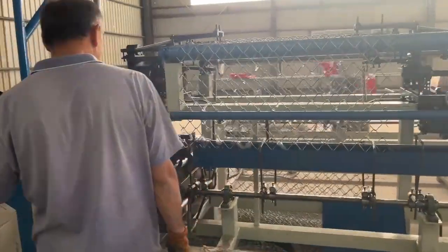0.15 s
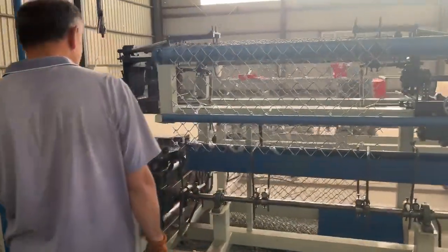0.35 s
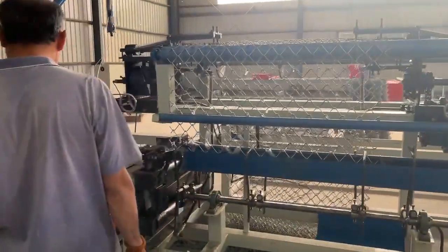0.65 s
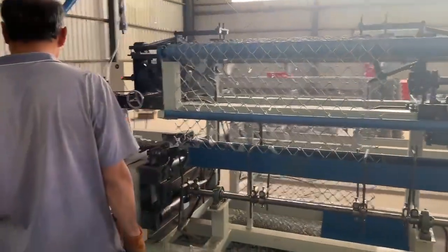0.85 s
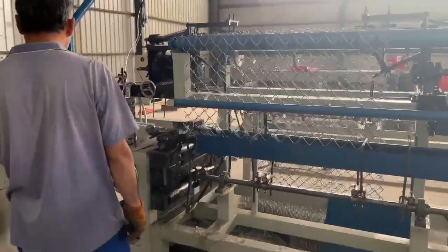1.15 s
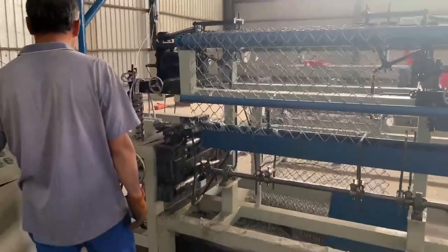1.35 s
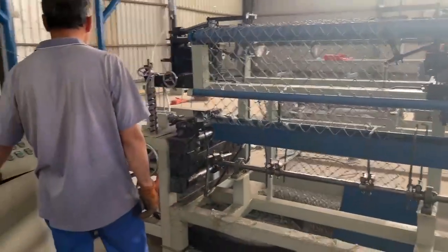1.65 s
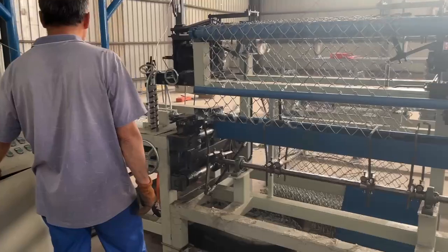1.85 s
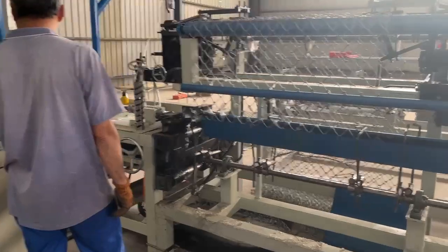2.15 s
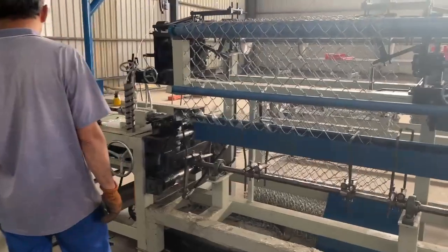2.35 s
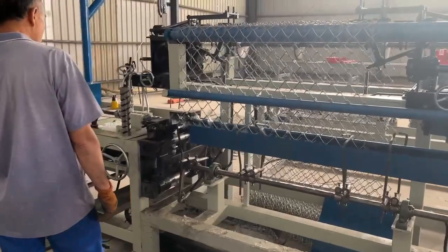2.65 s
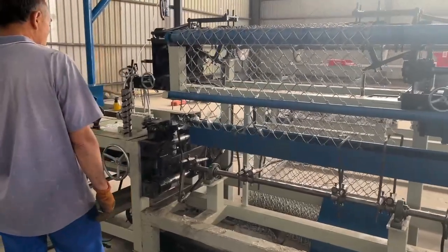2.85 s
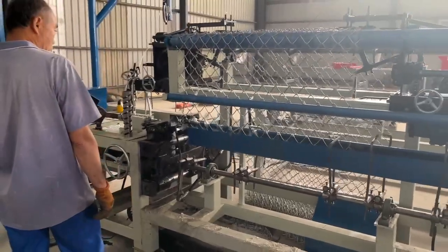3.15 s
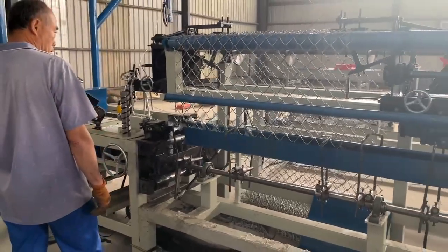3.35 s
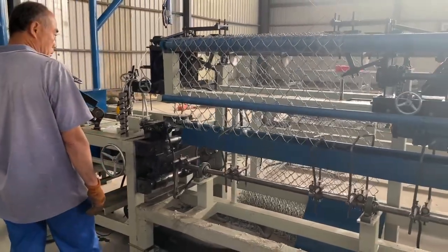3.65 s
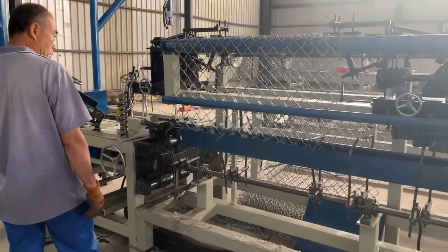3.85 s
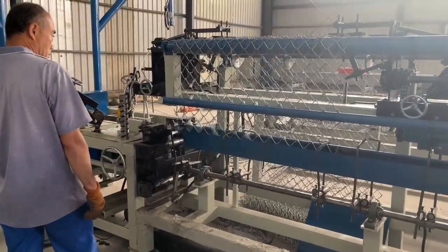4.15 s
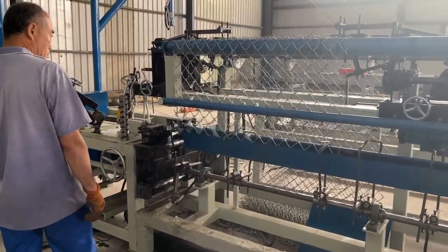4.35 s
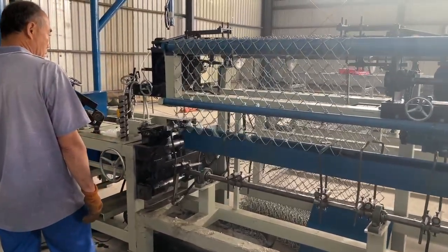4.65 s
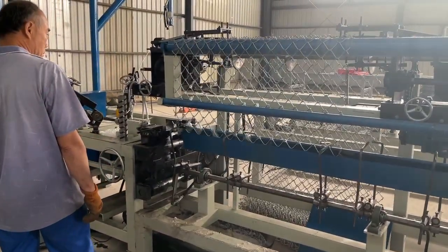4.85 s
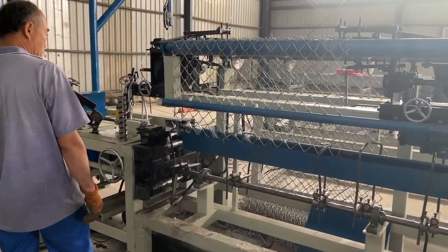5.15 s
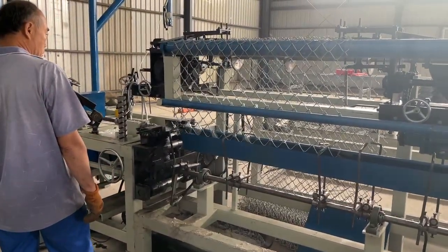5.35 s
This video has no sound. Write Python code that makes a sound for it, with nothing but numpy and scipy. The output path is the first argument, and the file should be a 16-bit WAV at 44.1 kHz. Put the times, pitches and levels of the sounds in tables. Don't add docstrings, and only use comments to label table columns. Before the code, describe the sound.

Sharp metallic wire slaps build to a rapid rattling beat, break off, then a single hard clank rings and small metal ticks follow.

```python
import sys
import numpy as np
from scipy import signal
from scipy.fft import rfft, irfft, next_fast_len
from scipy.io import wavfile
from scipy.ndimage import map_coordinates

SR = 44100
rng = np.random.default_rng(int(sys.argv[2]) if len(sys.argv) > 2 else 0)


def inscribe(sig):
    pcm = np.round(np.clip(np.atleast_2d(sig).T, -1, 1) * 32767)
    wavfile.write(sys.argv[1], SR, pcm.astype(np.int16))


def ratio(d):
    e = np.asarray(d, float) / 20
    return 10 ** e


N = 242975
TIME = np.arange(N) / SR

# [time_s, mesh_shaking_db, drive_load_db]
WORK = [(0, -36.5, -40), (.64, -38, -37.5), (1.1, -42, -37), (1.29, -35.5, -54), (1.47, -37.5, -47),
        (1.61, -30, -34), (2.53, -32, -36), (2.75, -25, -33), (3.21, -27, -32), (3.481, -33.5, -30),
        (3.591, -43, -46), (3.815, -29.5, -38), (3.865, -22.5, -29), (4, -36, -32), (4.45, -41, -33),
        (4.65, -53, -61), (4.93, -46, -42), (5.1, -38, -38)]
# [freq_hz, density_db_per_hz]
MESH_SPECTRUM = [(500, -4), (1200, 4), (2000, 2), (3500, 0.5), (6000, -4), (8000, -5.5), (11000, -10.5),
                 (15400, -20), (15900, -50)]
# [freq_hz, density_db_per_hz]
DRONE_SPECTRUM = [(15, -68), (25, -28), (53, -8.5), (199, -4), (319, -4), (385, -3), (433, -5.5), (562, -4),
                  (603, -5), (647, -5.5), (1870, -15), (7000, -38), (9100, -70), (15400, -120)]
DRONE_DB, LULL_S, LULL_LENGTH_S, LULL_DB = -29.5, 3.47, 0.27, -5
FAR_LINE_DB, SURGE_S, SURGE_LENGTH_S, SURGE_DB = -61.5, 1.2, 0.6, 20.5
MOUNT_UPPER_DB, STOP_S, STOP_DB = -40.5, 3.32, -16
# [pitch_hz, width_hz, level_db]
STEEL_MODES = [(1215, 10, -5.5), (1767, 39, 5.5), (2000, 78, -4), (2650, 41, 6), (3900, 10, -22),
               (4270, 35, 5.5), (4900, 20, -30), (5590, 43, 7), (6340, 54, -9)]
# [pitch_hz, width_hz, level_db]
FRAME_MODES = [(230, 3.3, 0), (297.7, 4.1, -5), (364.6, 3.4, 1.5), (415, 29.6, -1.5), (440.5, 5.4, 3.5),
               (458, 27.4, 0)]

# [start_s, peak_db, sizzle_db (re peak), bar_pitch_hz]
FEEDING = [(.0537, -23, -12, 6380), (.1003, -17, -25, 4380), (.115, -39, -21, 2000),
           (.1966, -21, -28, 3870), (.344, -22, -19, 6300), (.373, -26, -4, 5980),
           (.3965, -12.5, -16, 6310), (.4194, -25, -6, 4790), (.628, -30, -7, 4480),
           (.6491, -13, -9.5, 6000), (.6886, -18.5, -9, 4700), (.7205, -19.5, -7, 2350),
           (.9114, -27.5, -9, 2030), (.9273, -24, -13, 2500), (.953, -16, -13, 5700),
           (.9725, -17, -7, 4210), (.999, -15.5, -9, 4070), (1.211, -31, -8, 2080),
           (1.2612, -19.5, -9.5, 2040), (1.275, -15.5, -9, 5240), (1.3397, -13, -11, 2800),
           (1.4641, -22.5, -9, 2770), (1.5283, -27.5, -8.5, 2520)]
# [start_s, peak_db, sizzle_db (re peak), bar_pitch_hz]
WEAVING = [(1.5738, -15.5, -13, 4090), (1.6393, -15, -10, 5950), (1.7375, -13, -6, 4160),
           (1.8562, -12.5, -11, 2050), (1.939, -13, -18, 2350), (2.029, -10.5, -19, 3720),
           (2.0804, -12, -15, 2050), (2.162, -12, -16, 2060), (2.2458, -16.5, -11, 2630),
           (2.3229, -9.5, -14.5, 4030), (2.409, -9.5, -12, 2000), (2.4665, -12.5, -23, 5890),
           (2.5368, -9.5, -15, 4760), (2.6223, -8, -13.5, 2430), (2.697, -8.5, -19, 2070),
           (2.7714, -11, -21, 4270), (2.9242, -7, -14, 2650), (2.9893, -5.5, -17, 2165),
           (3.0749, -10.5, -14, 6340), (3.1605, -20.5, -8, 2630), (3.2358, -8, -19, 5470),
           (3.3113, -6.5, -10, 2115)]
# [start_s, peak_db, sizzle_db (re peak), bar_pitch_hz]
TOUCHES = [(1.6595, -15.5, -9.5, 4070), (1.8803, -15.5, -15, 4080), (1.896, -14, -16, 3900),
           (2.175, -15, -10, 4200), (2.0542, -12, -12, 4200), (2.187, -9, -20, 4230),
           (2.359, -15.5, -16, 5160), (2.382, -19, -17, 2040), (2.4818, -12, -11, 4420),
           (2.495, -11, -25, 6070), (2.783, -8, -19, 3190), (2.8024, -29, -20, 4180),
           (3.0894, -9.5, -26, 5630), (3.1097, -11.5, -25, 1760), (3.3274, -5.5, -31, 2040)]
# [start_s, peak_db, sizzle_db (re peak), bar_pitch_hz]
SETTLING = [(3.521, -29, -4, 3140), (3.5394, -27, -25, 1820), (3.5686, -23, -26, 2445),
            (3.6905, -22, -19, 3500), (3.754, -29, -6, 2770), (3.7852, -19.5, -5, 3340),
            (3.8442, -6, -29, 1870), (4.0122, -23.5, -4, 1790), (4.06, -27, -19, 1980),
            (4.125, -19.5, -26, 4860), (4.2994, -31, -16, 2300), (4.3994, -44, -27, 1970),
            (4.5875, -27, -13, 2000), (4.8199, -32, -30, 3570), (4.8404, -22, -16, 5374),
            (4.9094, -22.5, -11, 2000), (4.9167, -32, -11, 3360), (4.9636, -31, -11, 1890),
            (5.019, -37, -8.5, 2500), (5.0594, -28.5, -11, 2090), (5.0978, -41, -10, 1870),
            (5.1427, -26, -17, 2760), (5.1959, -14.5, -14, 4900), (5.2144, -37, -25, 2160),
            (5.2485, -24.5, -26, 2050), (5.4625, -23.5, -17, 1990), (5.5024, -14.5, -12, 6550)]
FEED_BODY_DB, WEAVE_BODY_DB, TOUCH_BODY_DB, SETTLE_BODY_DB = -13.5, -13.5, -15.5, -5
SLAP_T60_S, WEAK_LINGERS = 0.1, 0.28
TURN_S, HEAVY_AT_S, HEAVY_SPREAD_S, HEAVY_DB = 0.3045, 0.12, 0.039, 5
# [freq_hz, density_db_per_hz]
BODY_SPECTRUM = [(200, -33), (500, 1), (1000, 3.5), (1600, 8.5), (2300, -1.5), (3500, -23)]
# [freq_hz, density_db_per_hz]
CRACK_SPECTRUM = [(1200, -28), (2200, -3), (3500, -0.5), (5000, -1), (6800, -1.5), (9000, -14)]
# [freq_hz, density_db_per_hz]
SIZZLE_SPECTRUM = [(5500, -6), (7500, 3), (9000, 6), (11000, -4), (13000, -7), (15400, -2), (15900, -30)]
# [start_s, peak_db, pitch_hz, t60_s]
CLINKS = [(.975, -33, 4200, .1), (3.786, -19, 7200, 0.069), (3.876, -25, 5620, 0.11),
          (3.935, -28, 5650, .15), (4.126, -30, 4900, 0.17), (4.82, -28, 3530, 0.04),
          (4.842, -34, 3560, .04), (4.82, -29, 5420, 0.034), (4.822, -41, 4350, .1),
          (4.84, -31, 5520, 0.06), (4.88, -41, 5960, .07), (4.914, -28, 3385, 0.066),
          (4.93, -38, 3340, 0.11), (5.143, -43, 5610, .1), (5.197, -41, 4900, 0.13),
          (5.197, -29, 7200, .06), (5.197, -31, 5850, .05), (4.91, -44, 7050, 0.073),
          (5.249, -43, 5470, .08), (5.272, -39, 5550, .08), (5.463, -40, 5640, 0.062)]

# [start_s, peak_db]
SPARKS = [(0.0633, -25), (0.1012, -19), (0.1984, -27), (0.3481, -26), (0.3975, -28), (0.6499, -24),
          (0.9722, -28), (0.9996, -22), (1.2471, -27), (1.2745, -20), (1.3404, -15), (1.497, -27),
          (1.5299, -26), (1.5743, -19), (1.6591, -16), (1.7379, -18), (1.8572, -24), (1.8951, -18),
          (1.9385, -14), (2.0288, -18), (2.0537, -22), (2.0797, -14), (2.1615, -20), (2.175, -11),
          (2.2465, -14.5), (2.3226, -14.5), (2.3815, -19), (2.409, -8), (2.4833, -14), (2.4944, -20),
          (2.536, -10.5), (2.6219, -13), (2.6953, -10), (2.7716, -22), (2.7856, -11), (2.9257, -12.5),
          (2.9871, -9), (3.0742, -13), (3.0894, -15), (3.161, -15), (3.2355, -12), (3.31, -8),
          (3.5204, -40), (3.6895, -38), (3.7055, -28), (3.7808, -21), (3.8447, -15.5), (3.9335, -25),
          (4.0133, -19), (4.576, -45), (4.8464, -33), (4.9611, -30), (5.1953, -12.5), (5.461, -34),
          (5.5029, -14.5)]
# [freq_hz, density_db_per_hz]
SPARK_SPECTRUM = [(6000, -14), (9000, -7), (11500, -1), (13000, -3), (15300, -4), (15900, -35)]
# [start_s, peak_db, pitch_hz]
SNAPS = [(0.101, -18, 4330), (0.1991, -18, 3890), (0.3447, -11, 6400), (0.3965, -16, 6280),
         (0.411, -10.5, 1500), (0.6491, -9.5, 5960), (0.689, -16, 1640), (1.275, -13, 5200),
         (1.3409, -11.5, 1590), (1.6597, -13.5, 1500), (1.7376, -11.5, 4140), (1.8562, -19, 2040),
         (1.8964, -18, 4310), (1.9395, -9.5, 6520), (1.9494, -11, 1500), (2.0303, -12, 3770),
         (2.0537, -17, 4250), (2.0807, -23, 2120), (2.162, -15, 1990), (2.1754, -14, 2190),
         (2.189, -12, 4350), (2.2476, -14, 2590), (2.3226, -12, 4060), (2.3318, -9, 1800),
         (2.3585, -16, 5110), (2.3814, -13.5, 2460), (2.4094, -20, 2000), (2.4838, -3.5, 4330),
         (2.4954, -10, 5960), (2.5334, -10, 1940), (2.5388, -9.5, 1500), (2.6232, -10, 2420),
         (2.6973, -15, 2010), (2.7721, -10, 4220), (2.7833, -8, 3140), (2.802, -9, 4080),
         (2.9243, -9, 3740), (2.9298, -9.5, 2650), (2.9464, -11.5, 1780), (2.9897, -8, 4180),
         (2.9934, -9.5, 2140), (3.0746, -9, 6370), (3.0914, -9, 5620), (3.111, -8, 1790),
         (3.2352, -12, 5360), (3.3119, -12, 4430), (3.3294, -15, 1990), (3.3503, -7.5, 1760),
         (3.84, -12, 2290), (3.845, -5, 1970), (3.9922, -23, 2500), (4.0134, -12.5, 1690),
         (4.126, -16, 4770), (5.1971, -13.5, 1570)]
# [freq_hz, density_db_per_hz]
SNAP_SPECTRUM = [(1000, -27), (2000, -1), (4000, -1.5), (6300, 1), (7500, 2), (9500, -18)]

# [start_s, peak_db, t60_s]
BLOWS = [
    (0.404, -27, 0.18),
    (1.02, -26, 0.15),
    (3.317, -24, 0.38),
    (3.533, -30.5, 0.45),
    (3.555, -26, 0.31),
    (3.578, -23, 0.37),
    (3.848, -16.5, 0.51),
    (3.865, -38, 0.31),
    (5.084, -34, 0.18),
    (5.151, -28, 0.24),
]
# [freq_hz, density_db_per_hz]
THUD_SPECTRUM = [(40, -10), (100, 2), (300, 4.5), (700, 2), (1300, 2), (2200, -9), (4000, -14), (8000, -59)]
# [start_s, peak_db]
WIDE_PANEL = [(.41, -23), (1.246, -28.5), (1.739, -31), (2.261, -22), (2.399, -30), (2.699, -19),
              (2.818, -30), (2.991, -24.5), (3.181, -26), (3.309, -28), (3.581, -28), (3.849, -19.5),
              (4.082, -31)]
WIDE_HZ, WIDE_T60_S, NARROW_T60_S = 371.5, 0.44, 0.38
# [start_s, peak_db, pitch_hz]
NARROW_PANELS = [(.413, -25.5, 455), (1.024, -27, 431), (1.346, -24.5, 440), (1.452, -33, 439),
                 (1.633, -27, 457), (1.946, -21, 426), (2.136, -22, 461.5), (2.539, -35, 459),
                 (2.704, -36, 458), (2.809, -32, 435), (2.997, -25.5, 438), (3.315, -21, 444),
                 (3.452, -41, 445), (3.855, -22, 420), (4.082, -36, 425), (4.412, -26.5, 431.6)]

# [start_s, peak_db, t60_s]
CUTTER = [
    (3.846, -14.5, 0.05),
    (4.4, -25, 0.18),
    (3.6, -37, 0.17),
    (3.9, -32, 11.8),
]
# [freq_hz, density_db_per_hz]
CLANK_SPECTRUM = [(400, -45), (750, -6.5), (1100, 2.5), (1900, -0.5), (2700, -4.5), (4200, -12.5),
                  (6500, -24), (10000, -42)]
# [start_s, peak_db, pitch_hz, t60_s]
BED = [
    (3.846, -11.5, 785, 0.045),
    (3.846, -14, 2017, 0.084),
    (3.846, -13, 2840, .05),
    (3.847, -19, 1125, 0.045),
    (3.855, -20, 398.7, 0.16),
    (3.868, -12.5, 2090, .06),
    (3.575, -26.5, 327, .15),
    (3.585, -26, 480, 0.11),
    (3.606, -32, 302, .12),
]

# [freq_hz, t60_s]
HALL_DECAY = [(100, 0.48), (500, 2.5), (2000, 0.89), (4000, 1.3), (7000, 0.72), (14000, 0.49)]
# [freq_hz, likeness_0_to_1]
PORT_LIKENESS = [(60, 1), (300, 0.92), (700, 0.37), (1300, 0.36), (2500, 0.64), (4400, 0.24), (6300, 0.46),
                 (7500, 0.83), (8500, 0.92), (16000, 0.84)]
# [freq_hz, lead_rad]
PORT_LEAD = [(0, 0), (860, .4), (1550, -1.5), (1900, .6), (4400, .8), (5600, -1.1), (6500, -1.45),
             (16500, -10.5)]
# [freq_hz, left_minus_right_db]
PORT_TILT = [(60, -0.5), (110, 0.5), (200, -1), (380, 1), (700, 0.5), (1290, 0), (2380, 2), (4400, 7),
             (8120, 0), (15000, -0.5)]


def unit(x):
    return x / np.sqrt(np.mean(x ** 2) + 1e-20)


def along(points, hz):
    f, v = np.transpose(points)
    return np.interp(np.log(hz + 1), np.log(f + 1), v)


def wobble(rate):
    knots = rng.standard_normal(int(N * rate / SR) + 4)
    return map_coordinates(knots, [TIME * rate])


def swell(at, length):
    return np.exp(-((TIME - at) / length) ** 2)


def filtered(x, response):
    m = next_fast_len(N + SR // 2)
    hz = np.fft.rfftfreq(m, 1 / SR)
    return irfft(rfft(x, m) * response(hz), m)[..., :N]


def modes(table):
    def response(f):
        total = 0
        for k, (center, width, db) in enumerate(table):
            damping = 1j * f * width
            total = total + (-1) ** k * ratio(db) * damping / (center * center - f * f + damping)
        return total
    return response


def hiss(spectrum, grit_db, rate):
    noise = rng.standard_normal((2, N)) * ratio(grit_db * wobble(rate))
    lowest_hz = 0.7 * spectrum[0][0]
    return unit(filtered(noise, lambda hz: ratio(along(spectrum, hz)) * (hz > lowest_hz)))


def bursts(starts, peak_db, t60, rise, hold):
    power = np.zeros(N + SR)
    for s, db, life in zip(starts, peak_db, np.maximum(t60, 0.02)):
        t = np.arange(round(min(life + hold, 0.9) * SR)) / SR
        snap = 1 + 0.89 * np.exp(-t / 0.0042)
        fade = ratio(db - 60 * np.maximum(t - hold, 0) / life)
        shape = np.minimum(t / rise, 1) * snap * fade
        power[round(s * SR):][:len(t)] += shape ** 2
    return np.sqrt(power[:N])


def rings(starts, peak_db, hz, t60, rise, rough_db):
    out = np.zeros((2, N + SR))
    phases = rng.uniform(0, 2 * np.pi, (len(starts), 2, 1))
    for s, db, f, life, phase in zip(starts, peak_db, hz, np.clip(t60, 0.02, 0.9), phases):
        t = np.arange(round(life * SR)) / SR
        fade = ratio(db - 60 * t / life) * (1 - np.exp(-t / rise))
        out[:, round(s * SR):][:, :len(t)] += fade * np.sin(2 * np.pi * f * t + phase)
    return out[:, :N] * ratio(rough_db * (np.clip(wobble(250), -3, 1.2) + 0.4))


def steady():
    s, *levels = np.transpose(WORK)
    mesh_db, hum_db = (np.interp(TIME, s, level) for level in levels)
    ticks = hiss(MESH_SPECTRUM, grit_db=2.0, rate=280) * ratio(2.1 * wobble(40))
    mesh = ratio(mesh_db) * unit(ticks + ratio(2.0) * filtered(ticks, modes(STEEL_MODES)))
    shakes = rng.standard_normal((2, N)) * ratio(1.6 * wobble(31))
    hum = ratio(hum_db - 1.5) * unit(filtered(shakes, lambda hz: modes(FRAME_MODES)(hz) ** 2))
    drone_db = DRONE_DB + LULL_DB * swell(LULL_S, LULL_LENGTH_S)
    drone = ratio(drone_db - 2.0 + 1.6 * wobble(4.32)) * hiss(DRONE_SPECTRUM, grit_db=0.3, rate=55)
    return mesh + hum + drone


def motor():
    low_db = FAR_LINE_DB + SURGE_DB * swell(SURGE_S, SURGE_LENGTH_S)
    stopped = np.clip((TIME - STOP_S) / 0.21, 0, 1)
    upper_db = MOUNT_UPPER_DB + STOP_DB * stopped + 0.79 * wobble(2.86)
    low = ratio(low_db) * np.sin(2 * np.pi * 69 * TIME + 2.0 * wobble(4.4))
    upper = ratio(upper_db) * np.sin(2 * np.pi * 232.5 * TIME + 1.0 * wobble(7.4))
    return (low + upper) * np.ones((2, 1))


def slaps():
    kinds = [(FEEDING, FEED_BODY_DB), (WEAVING, WEAVE_BODY_DB),
             (TOUCHES, TOUCH_BODY_DB), (SETTLING, SETTLE_BODY_DB)]
    events = [(*row, body) for rows, body in kinds for row in rows]
    s, db, sizzle_db, bar_hz, body_db = np.transpose(events)
    t60 = SLAP_T60_S * ratio(-WEAK_LINGERS * (db + 6.5))
    off_guide = (s - HEAVY_AT_S + TURN_S / 2) % TURN_S - TURN_S / 2
    turning = s < SETTLING[0][0]
    body_db = body_db + HEAVY_DB * np.exp(-(off_guide / HEAVY_SPREAD_S) ** 2) * turning

    body_envelope = bursts(s, db + body_db - 5.5, 2.0 * t60, rise=0.0046, hold=0.0076)
    body = hiss(BODY_SPECTRUM, grit_db=-1.5, rate=700) * body_envelope
    crack_envelope = bursts(s, db - 12.5, 0.98 * t60, rise=0.00043, hold=0.0088)
    crack = hiss(CRACK_SPECTRUM, grit_db=1.0, rate=500) * crack_envelope
    sizzle_envelope = bursts(s, db + sizzle_db - 2, 0.28 * t60, rise=0.00057, hold=0.01)
    sizzle = hiss(SIZZLE_SPECTRUM, grit_db=3.0, rate=360) * sizzle_envelope
    wire = body + crack + sizzle

    bar = rings(s, db - 15, bar_hz, 0.8 * t60, rise=0.0015, rough_db=5)
    clinks = rings(*np.transpose(CLINKS), rise=0.00083, rough_db=5)
    return wire + bar + clinks + ratio(1.5) * filtered(wire, modes(STEEL_MODES))


def snaps():
    s, db, hz = np.transpose(SNAPS)
    front_envelope = bursts(s, db - 13.0, np.full_like(s, 0.025), rise=0.00047, hold=0.0017)
    front = hiss(SNAP_SPECTRUM, grit_db=-1.0, rate=900) * front_envelope
    note = rings(s, db - 9, hz, np.full_like(s, 0.035), rise=0.0004, rough_db=1.0)
    s, db = np.transpose(SPARKS)
    spark_envelope = bursts(s, db - 9.5, np.full_like(s, 0.022), rise=0.0005, hold=0.0023)
    spark = hiss(SPARK_SPECTRUM, grit_db=2.5, rate=1000) * spark_envelope
    return front + note + spark


def blows():
    s, db, t60 = np.transpose(BLOWS)
    thud = hiss(THUD_SPECTRUM, grit_db=2.0, rate=300) * bursts(s, db, t60, rise=0.008, hold=0.0053)
    wide = [(*row, WIDE_HZ, WIDE_T60_S) for row in WIDE_PANEL]
    narrow = [(*row, NARROW_T60_S) for row in NARROW_PANELS]
    s, db, hz, t60 = np.transpose(wide + narrow)
    panels = rings(s, db - 5.5, hz, t60, rise=0.0035, rough_db=4.5)
    return thud + ratio(1.5) * filtered(thud, modes(FRAME_MODES)) + panels


def cutter():
    s, db, t60 = np.transpose(CUTTER)
    bang = hiss(CLANK_SPECTRUM, grit_db=3.0, rate=130) * bursts(s, db, t60, rise=0.00098, hold=0.0053)
    bed = rings(*np.transpose(BED), rise=0.0012, rough_db=1.5)
    return bang + ratio(4.0) * filtered(bang, modes(STEEL_MODES)) + bed


def hall(x):
    hz, t, z = signal.stft(rng.standard_normal((2, 3 * SR // 2)), SR, nperseg=256)
    decay = ratio(-60 * t / along(HALL_DECAY, hz)[:, None])
    tail = signal.istft(z * decay, SR, nperseg=256)[1]
    tail = np.pad(tail / np.linalg.norm(tail[0]), ((0, 0), (400, 0)))
    return signal.fftconvolve(x, tail, axes=1)[:, :N]


def scene():
    wire = slaps() + snaps()
    thud = blows()
    bang = cutter()
    answer = hall(ratio(-8.0) * wire + ratio(-10.5) * thud + ratio(-4.0) * bang)
    return wire + thud + bang + answer + steady() + motor()


def top_cut(x):
    return signal.sosfilt(signal.butter(12, 15450, fs=SR, output="sos"), x)


def record(dry):
    def mixing(hz):
        turn = np.arccos(np.clip(along(PORT_LIKENESS, hz), 0, 1)) / 2
        return np.array([np.cos(turn), np.sin(turn)])

    def port_responses(hz):
        lead = np.interp(hz, *np.transpose(PORT_LEAD))
        left = ratio(along(PORT_TILT, hz) / 2) * np.exp(0.5j * lead)
        return np.array([left, 1 / left])

    shared, split = filtered(dry, mixing)
    ports = filtered(np.array([shared + split, shared - split]), port_responses)
    ports = ports / (1 + np.abs(ports / 0.92) ** 4) ** 0.25
    return top_cut(ports)


dry = scene()
out = record(dry)
inscribe(out)
```